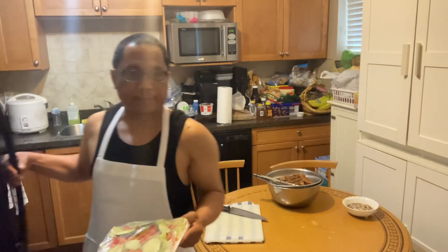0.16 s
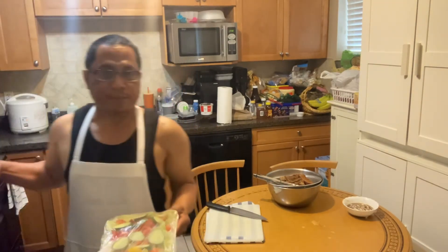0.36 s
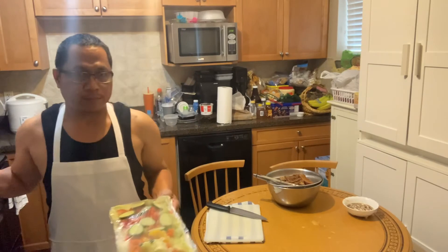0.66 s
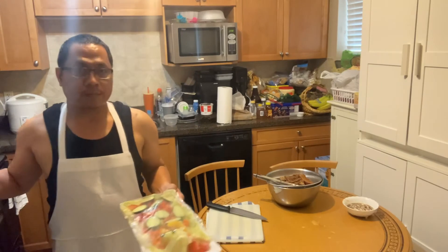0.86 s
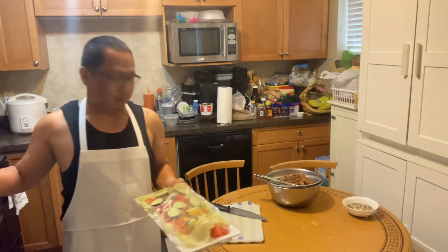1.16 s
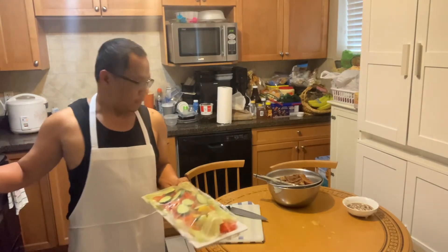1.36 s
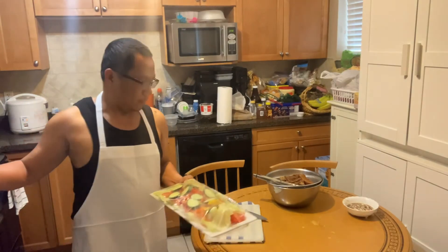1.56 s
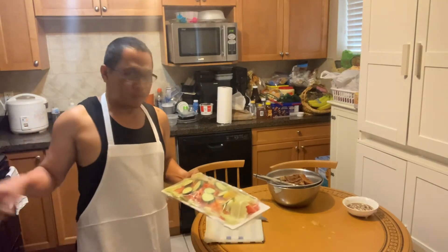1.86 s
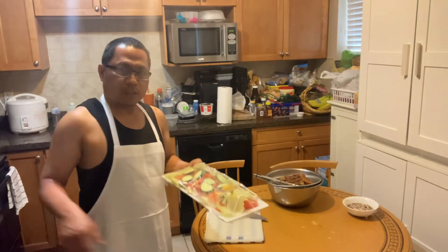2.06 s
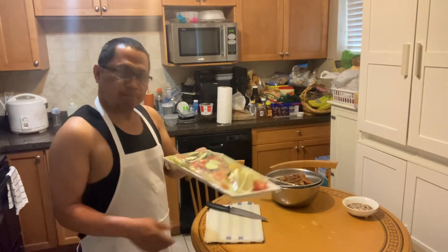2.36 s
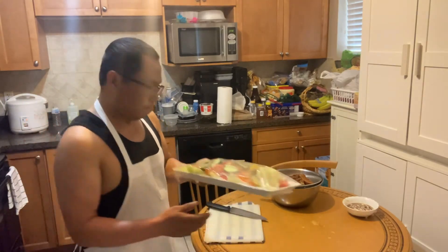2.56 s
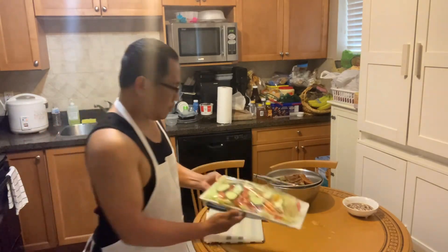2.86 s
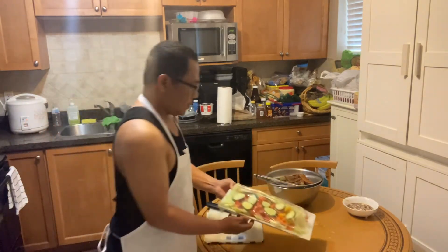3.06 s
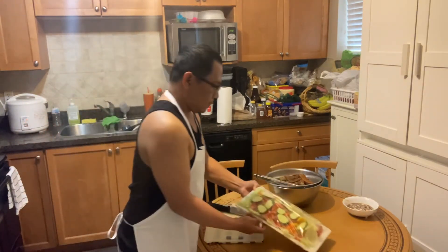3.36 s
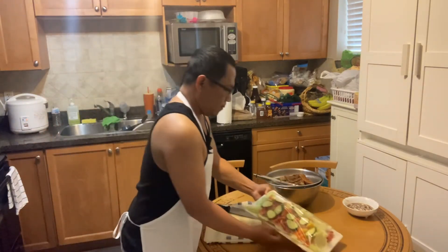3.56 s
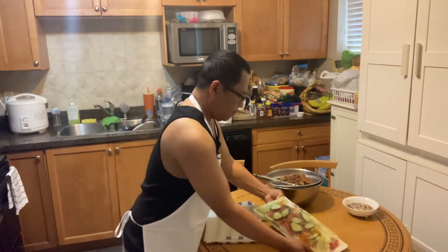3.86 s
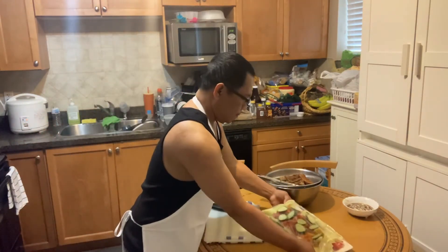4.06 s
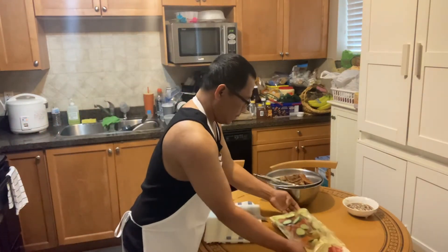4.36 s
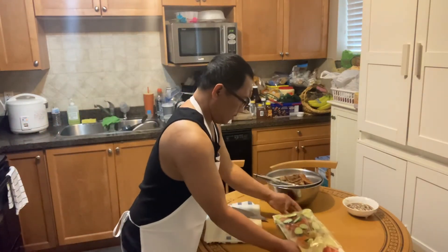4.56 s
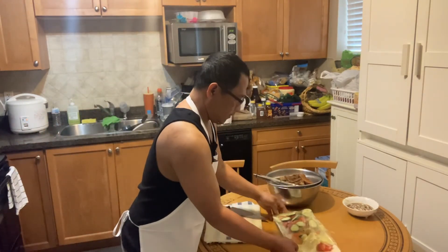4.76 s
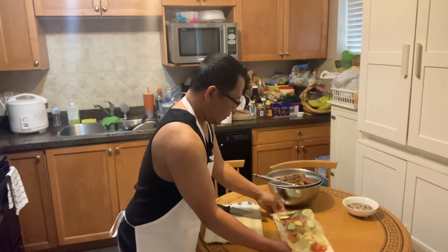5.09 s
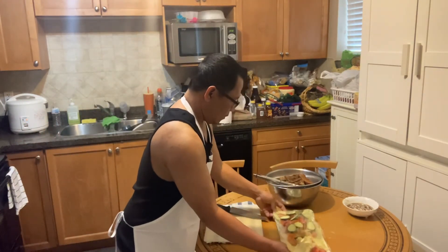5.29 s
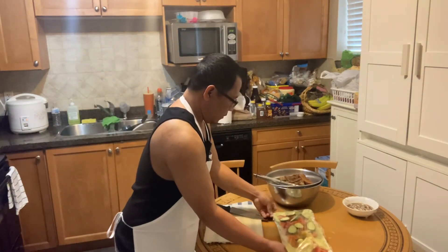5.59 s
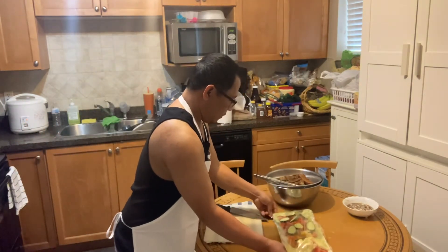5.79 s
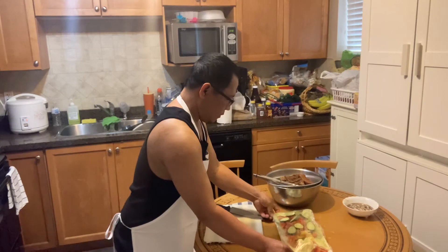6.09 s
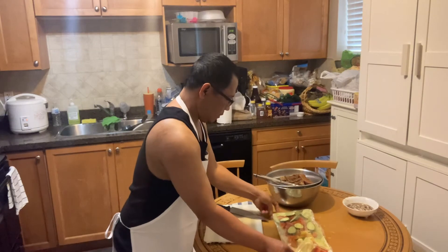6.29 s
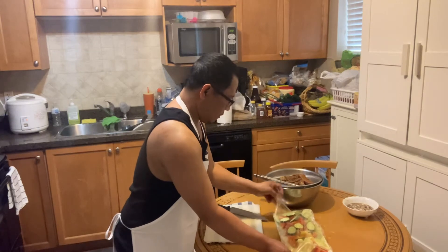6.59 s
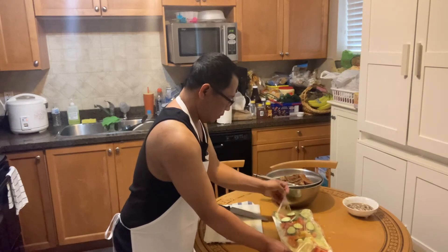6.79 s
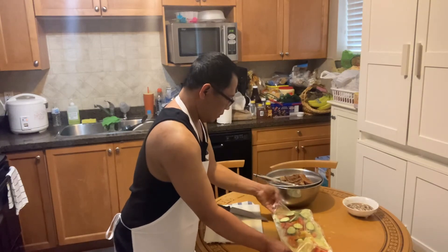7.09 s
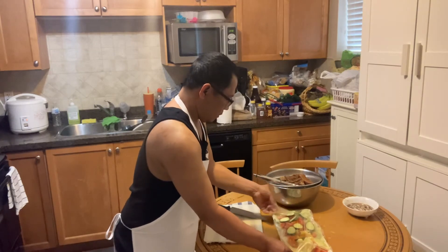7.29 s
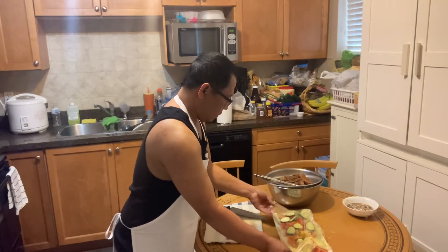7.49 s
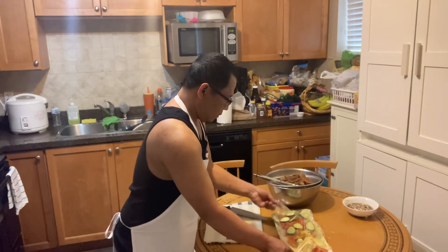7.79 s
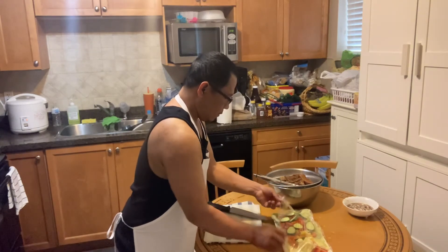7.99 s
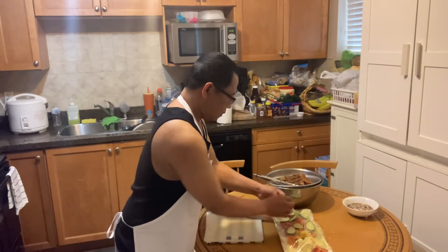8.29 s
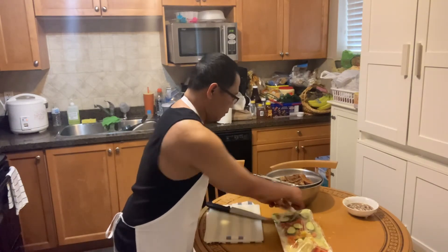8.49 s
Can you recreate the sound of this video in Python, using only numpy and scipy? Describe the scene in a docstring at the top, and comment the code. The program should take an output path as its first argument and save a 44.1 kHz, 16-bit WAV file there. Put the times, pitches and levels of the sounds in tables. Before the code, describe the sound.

A solid, boxy door thud on the left opens the scene, followed by a smaller knock and a soft deep bump. After a near-quiet gap with slight cloth and film rustle, a loaded platter clatters on a wooden tabletop in a quick cluster, then lands with a loud knock. Thin plastic wrap crinkles and snaps loose, busiest near the end. Short kitchen reverberation, low fridge drone, close stationary microphone.

```python
"""Refrigerator door, platter and cling film

A small home kitchen: a refrigerator door knocks and shuts, blows exciting its modes and a broad crack.
A platter is set down and dragged on a wooden table, whose top rings as damped modes under rim clatter.
Cling film is picked at and peeled: tiny random creases make its rustle, noise bursts its snaps; an apron
brushes too. Room air and a refrigerator drone, noise-driven resonances, lie below it all."""
import sys
import numpy as np
from scipy import signal
from scipy.fft import rfft, irfft, next_fast_len
from scipy.io import wavfile

SR = 44100
rng = np.random.default_rng(int(sys.argv[2]) if len(sys.argv) > 2 else 0)


def put_to_file(sound):
    """Save the sound as 16-bit audio at rate SR, in the file named by the first command-line argument."""
    columns = np.atleast_2d(sound).T  # one column per channel
    safe = np.clip(columns, -1, 1)
    whole_steps = np.round(safe * 32767)
    wavfile.write(sys.argv[1], SR, whole_steps.astype(np.int16))


N = 381024   # length in samples

# Edges of the half-octave noise bands. Each entry: frequency in Hz.
BAND_EDGES = 25 * 2 ** np.arange(0, 9.6, .5)
# Film snapping free. Each row: start in seconds, peak level of the tick in dB, body in dB relative to
# the tick, left-right balance in dB (positive is left), level of the crackle that follows in dB.
FILM_SNAPS = [(2.58, -55, 1, 0, -66), (3.15, -61, 7, 2, -65), (3.249, -43, -10.5, 2, -49),
              (3.323, -50, -5.5, 0, -51), (3.519, -58, -15, -4, -66), (3.71, -48, -5, 11, -51),
              (3.856, -52, -2, 0, -47.5), (4.027, -51, -23, -2, -48), (4.1785, -56, -16, -1, -55),
              (4.526, -56, -24, 10, -55), (4.699, -59, 14.5, 2, -88), (4.9155, -40, -13, 7, -43.5),
              (5.068, -47.5, -13, -11, -52), (5.212, -48, -11, 3.5, -53), (5.4862, -42, -12, 2, -56),
              (5.555, -61, -25, -20, -53), (6, -66.5, -12, -6.5, -57), (6.845, -43.5, -13, 10, -61),
              (7.1284, -46, -5, 2, -54), (7.245, -43, -24, -2, -55), (7.319, -41, -10, 4, -67),
              (7.38, -54, -16.5, 2, -64), (7.4, -44, -14, 0, -61), (7.4216, -42.5, -6, -11, -46),
              (7.451, -35, -20, 3, -62), (7.5466, -25, -6.5, 3.5, -37), (7.6069, -31.5, -3, 3, -49),
              (7.657, -33, -1.5, 5, -42), (7.708, -48, -12, 1, -60), (7.7194, -28.5, -4.5, 2, -38.5),
              (7.76, -33, -1.5, 2, -46.5), (7.989, -34.5, -7, 2, -49), (8.196, -50.5, -2, 4, -77),
              (8.269, -38.5, -16, 6, -49.5), (8.362, -52, -11, 3, -56.5)]
# Platter on the table. Each row: start in seconds, centre in Hz of the modes struck hardest, peak level
# of the ring in dB, peak level of the clatter in dB, hardness in dB per octave, seconds until the platter
# settles, slips in dB relative to unit contact force, left-right balance in dB (positive is left),
# boost of the top's main ring in dB, boost of the treble in dB.
PLATTER_KNOCKS = [(3.632, 2250, -19.5, -23, -6, 0.066, -12, -3, -5, 2.5),
                  (3.729, 700, -49, -44, -16, 0.02, -15, -5, 3, 3),
                  (3.874, 1900, -13, -16.5, -1, 0.12, -15, -2.5, -1, -5.5),
                  (3.914, 1250, -20, -24.5, -6.5, 0.09, -9, -4.5, 5, -10),
                  (3.961, 1400, -24.5, -35, -6.5, 0.062, -29, 3, 0, -10),
                  (3.998, 1250, -28, -28.5, -15, 0.042, -10, -5, 9, -2),
                  (4.188, 2700, -40.5, -50, -10, 0.28, 10, -3, 5, 11),
                  (4.226, 1900, -44.5, -54, -1, 0.053, -5, 3, -2, 1),
                  (4.287, 1400, -35, -35.5, -4.5, 0.039, -8, 2, -7, 6),
                  (4.302, 1900, -28, -35, -6, 0.054, 3, -5.5, -0.5, 4),
                  (4.375, 1300, -20, -19.5, -7.5, 0.064, -13, 1.5, -5.5, 7),
                  (5.286, 1000, -26, -33, 2, 0.028, -8, -2.5, -12, -5),
                  (5.297, 1200, -10, -8, 5, 0.09, -20, -1, 2, -2.5),
                  (5.301, 2420, -7.5, -12, 1.5, 0.071, -30, -3.5, -1.5, -10.5),
                  (5.667, 1400, -39, -52.5, 1.5, 0.042, -18.5, -2, 13, 9),
                  (6.61, 500, -57.5, -40, -18, 0.032, -6, -2, -5.5, -1.5)]


def amp(db):
    """Logarithmic level: decibels to amplitude gain."""
    return 10 ** (np.asarray(db) / 20)


def rms_one(x):
    """Power normalisation: scaled to rms 1."""
    return x / np.sqrt(np.mean(x ** 2) + 1e-20)


def at_hz(points, hz):
    """Interpolation of a spectrum table on a logarithmic frequency axis."""
    table_hz, values = np.array(points).T
    return np.interp(np.log(hz), np.log(table_hz), values)


def band(x, low_hz, high_hz):
    """Band-pass filtering: second-order Butterworth slopes."""
    return signal.sosfilt(signal.butter(2, [low_hz, high_hz], "band", fs=SR, output="sos"), x + 1e-18)


def colour(x, spectrum):
    """Spectral shaping: a white input is weighted bin by bin in the frequency domain."""
    size = next_fast_len(len(x))
    hz = np.maximum(np.arange(size // 2 + 1) * SR / size, 1)
    return irfft(rfft(x, size) * amp(at_hz(spectrum, hz)), size)[:len(x)]


def sides(pan_db):
    """Intensity stereo: left and right gains that differ by pan_db."""
    return amp(np.array([[.5], [-.5]]) * pan_db)


def drift(rate):
    """Random modulation: straight lines between normal draws, rate of them a second (at most 40)."""
    knots = rng.standard_normal(int(N / SR * 40) + 2)
    return np.interp(np.arange(N) / SR * min(rate, 40), np.arange(len(knots)), knots)


def ring(force, hz, t60):
    """Damped resonator: a unit click rings as a cosine of height 1; little passes far below its pitch."""
    radius = amp(-60 / (max(t60, .005) * SR))
    w = 2 * np.pi * hz / SR
    return signal.lfilter([.5, 0, -.5], [1, -2 * radius * np.cos(w), radius * radius], force)


def add(out, sound, s, peak_db, pan_db):
    """Superposition: lays a sound in at its time, peak level and place."""
    i = round(s * SR)
    piece = sides(pan_db) * amp(peak_db) * sound / np.abs(sound).max()
    out[:, i:i + len(sound)] += piece[:, :N - i]


def stereo_bands(size, gain, likeness):
    """Interchannel correlation: half-octave noise bands, each mixing a common and an opposed signal."""
    out = 0
    white = rng.standard_normal((2, 2, size))   # neighbouring bands use different noise
    for k, (low, high) in enumerate(zip(BAND_EDGES, BAND_EDGES[1:])):
        mid, side = band(white[k % 2], low, high)
        hz = np.sqrt(low * high)
        alike = np.clip(at_hz(likeness, hz), -1, 1)
        stereo = np.sqrt(1 + alike) * mid + np.sqrt(1 - alike) * side * [[1], [-1]]
        out = out + gain(hz) * stereo
    return out


def floor():
    """Broadband noise and noise-driven resonance: uneven room air and the refrigerator's wavering drone."""
    # Spectrum of the room air. Each row: frequency in Hz, relative density in dB per Hz.
    air_spectrum = [(15, -55), (25, -32), (48, -20), (70, 1.5), (101, -39.5), (211, -8), (242, -8),
                    (366, -28), (471, -15), (779, -19.5), (835, -24.5), (1070, -23), (6000, -48),
                    (7800, -71.5), (13200, -120)]
    # Likeness of the two sides of the air. Each row: frequency in Hz, correlation.
    air_likeness = [(60, 1), (180, 0.88), (550, 0.45), (1650, -0.85), (4970, -1.7), (15000, -0.3)]
    # Lean of the air. Each row: frequency in Hz, left-right balance in dB (positive is left).
    air_lean = [(60, 3), (180, 1), (550, 2), (1650, 3.5), (4970, 5), (15000, -12)]
    # Resonances stirred by the drone. Each row: frequency in Hz, width in Hz, rms level in dB,
    # left-right balance in dB (positive is left).
    drone_resonances = [(56.84, 1.7, -65.5, -7), (132.1, 22, -66.5, -4), (170, 4.6, -69, 3.5),
                        (215.25, 4.6, -59, -5), (364, 22, -65.5, -3.5)]
    air_rms_db = -59

    def air_gain(hz):
        """Amplitude modulation: one band's level wanders slightly."""
        return amp(at_hz(air_spectrum, hz) + 0.47 * drift(8.1)) * sides(at_hz(air_lean, hz))

    out = amp(air_rms_db) * rms_one(stereo_bands(N, air_gain, air_likeness))
    for hz, width, db, pan_db in drone_resonances:
        t60 = np.log(1000) / (np.pi * width)
        hum = ring(rng.standard_normal(N), hz, t60)
        out = out + sides(pan_db) * amp(db) * rms_one(hum)
    return out


def door():
    """Modal excitation: a smooth push drives the low modes, ragged contact the middle ones and a crack."""
    # Door blows. Each row: start in seconds, peak of the middle modes in dB, peak of the low modes in dB,
    # peak of the crack in dB, crack tilt in dB per octave, crack bottom in Hz, crack top in Hz, contact
    # time scale in seconds, push time scale in seconds, shaking as a share of contact noise,
    # left-right balance in dB (positive is left), boost of the deepest mode in dB.
    blows = [(0.062, -56, -60, -35.5, -2.5, 400, 6030, 0.036, 0.002, 0.0092, 12, -1),
             (0.079, -5.5, -10, -21.5, -11, 384, 5050, 0.022, 0.00064, 0.02, 7.5, 15),
             (0.093, -19, -21, -14, -1.5, 414, 5200, 0.016, 0.0023, 0.012, 9.5, 12),
             (0.114, -37, -23.5, -28, 1, 297, 4000, 0.012, 0.0022, 0.022, 6, 1),
             (0.444, -27, -38.5, -27.5, -3.5, 292.4, 4500, 0.019, 0.00085, 0.037, 5, 4),
             (0.656, -62, -63, -50, 0, 880, 5160, 0.062, 0.0039, 0.052, 6, -5),
             (0.717, -74, -50, -39.5, 1, 870, 4340, 0.017, 0.002, 0.08, 8.5, -7),
             (0.839, -73, -69, -52.5, 3, 1490, 12800, 0.049, 0.0022, 0.088, 9.5, 24),
             (1.37, -70, -22.5, -20, 2.5, 150, 14200, 0.026, 0.0018, 0.0092, 9, 25.5)]
    # Modes of door and cabinet. Each row: frequency in Hz, relative level in dB, decay t60 in seconds.
    modes = [(50.4, 2, 0.058), (73.65, -4.5, 0.9), (124, 12.5, 0.14), (154, 15, 0.06), (196, 10.5, 0.07),
             (248, 11, 0.076), (427, -3.5, 0.11), (527, -2.5, 0.067), (670, 6, 0.099), (806, 9.5, 0.04),
             (964, 15, 0.033), (1077, 12.5, 0.024), (1299, 1.5, 0.067), (1452, -1.5, 0.03),
             (1800, -4, 0.045), (1940, -31, 0.061), (2770, -24, 0.047), (4830, -24, 0.031)]
    # Crack of latch, seal and shelves. Each row: frequency in Hz, relative density in dB per Hz.
    crack_spectrum = [(120, 21.5), (330, 21), (700, 11), (1500, 5), (3000, -0.5), (4600, -2), (6300, -3),
                      (9000, -5.5), (13000, -16), (15800, -29.5)]
    latch_strength = 8.5   # sharp blow of the latch against the ragged contact

    out, panel = np.zeros((2, N)), np.zeros((2, N))
    t = np.arange(SR // 2) / SR
    latch = latch_strength * (np.arange(len(t)) == 80)   # a single click, in samples after the start
    for (s, knock_db, push_db, crack_db, tilt_db, low_hz, top_hz,
         contact, push, shake, pan_db, deep_db) in blows:
        force = rng.standard_normal(len(t)) * t / contact * np.exp(-3 * t / contact)
        # jars on the shelves
        shaking = rng.standard_normal(len(t)) * np.clip(t / contact, 0, 1) * np.exp(-t / 0.036)
        ragged = force + shake * shaking
        shove = np.exp(-((t - .007) / push) ** 2)   # a longer push leaves out the higher of the low modes
        lows, mids = 0, 0
        for k, (hz, db, t60) in enumerate(modes):
            if hz < 300:
                lows = lows + amp(db + deep_db * (hz < 60)) * ring(shove, hz, t60)
            else:   # the latch drives neighbouring modes with opposite sign
                mids = mids + amp(db) * ring(ragged + (-1) ** k * latch, hz, t60)
        crack = colour(ragged, [(hz, db + tilt_db * np.log2(hz)) for hz, db in crack_spectrum])
        crack = band(band(crack, low_hz, top_hz), low_hz, top_hz)
        add(out, lows, s, push_db, pan_db - 14.5)   # the low modes lie further right
        add(panel, mids, s, knock_db, pan_db)
        add(out, crack, s, crack_db, pan_db)
    return out, panel


def brush(t, s, swell, hold, db):
    """Power envelope: a brush swells, holds and fades exponentially."""
    swell_db, fade_db_per_s = 18, 178
    early = np.maximum(s + swell - t, 0)
    late = np.maximum(t - s - swell - hold, 0)
    return amp(db - swell_db * early / swell - fade_db_per_s * late) ** 2


def crackle(t, s, db):
    """Power envelope: a crackle starts quickly, holds and fades exponentially."""
    rise_s, hold_s, fade_db_per_s = 0.0097, 0.0028, 205.5
    late = np.maximum(t - s - hold_s, 0)
    return np.clip((t - s) / rise_s, 0, 1) * amp(db - fade_db_per_s * late) ** 2


def rustle():
    """Shot noise: thousands of tiny creases a second, clumped and uneven in size, form film and cloth."""
    # Hands working at the film. Each row: time in seconds, treble level in dB, middle relative to it in dB.
    handling = [(2.9, -78, -3), (3.05, -69.5, -1), (3.331, -69.5, 0), (3.48, -67.5, -6), (4.30, -59, -0.5),
                (4.66, -67, 0.5), (4.731, -72, 5), (4.80, -58, -12), (4.88, -62, -10), (5.45, -56, -5),
                (5.869, -64, -12.5), (5.95, -77.5, -0.5), (6.159, -55, -11.5), (6.29, -50, -14.5),
                (6.394, -42.5, -5.5), (6.47, -57, -11), (6.821, -56.5, -11), (7.11, -65.5, -10),
                (7.299, -52, -10.5), (7.46, -48, -8.5), (7.52, -57, -4.5), (7.7, -61, -15),
                (7.80, -72, -17), (7.92, -61.5, -6), (8.1, -56.5, -7.5), (8.401, -65, -15.5),
                (8.569, -80.5, -22.5), (8.64, -53, -9)]
    # The apron brushing as the cook turns. Each row: start in seconds, swell in seconds, hold in seconds,
    # cloth level in dB, middle relative to it in dB.
    apron_brushes = [(0.328, 0.046, 0.11, -73.5, 3.5), (0.45, 0.022, 0.022, -64.5, -23),
                     (0.978, 0.029, 0.61, -72, -9), (1.104, 0.031, 0.022, -83, 15),
                     (1.86, 0.02, 0.0089, -95.5, 22.5), (2.142, 0.025, .01, -95.5, 23),
                     (2.432, 0.072, 0.14, -66.5, -7), (2.858, 0.026, 0.018, -82.5, 9.5)]
    # Spectrum of the film. Each row: frequency in Hz, relative density in dB per Hz.
    film_spectrum = [(1200, -27.5), (2000, -19.5), (4000, -1), (6000, -8.5), (8500, 0), (12000, -4),
                     (15800, 3.5)]
    # Spectrum of the apron. Each row: frequency in Hz, relative density in dB per Hz.
    apron_spectrum = [(1200, -35), (4000, -4.5), (6000, -19), (8500, -7.5), (12000, -2.5), (15800, 0.5)]
    crackle_middle_db = -4.5   # added to the crackle's level and to any negative body level of the snap
    # level after a full-scale knock; share of the knock's dB added to it; delay after the knock
    knock_crackle_db, knock_share, knock_delay_s = -54.5, 0.21, 0.01
    crease_spread_db, flicker_db = 4.1, 1.8   # unevenness of single creases; from moment to moment

    s, treble_db, middle_db = np.transpose(handling)
    t = np.arange(N // 32 + 2) * 32 / SR   # envelopes are computed every 32 samples
    treble = amp(np.interp(t, s, treble_db)) ** 2
    middle = treble * amp(np.interp(t, s, middle_db)) ** 2
    cloth = 0
    for s, swell, hold, db, middle_db in apron_brushes:
        cloth = cloth + brush(t, s, swell, hold, db)
        middle = middle + brush(t, s, swell, hold, db + middle_db)
    for s, _, body_db, _, db in FILM_SNAPS:
        treble = treble + crackle(t, s, db)
        middle = middle + crackle(t, s, db + min(body_db, 0) + crackle_middle_db)
    for s, _, ring_db, *_ in PLATTER_KNOCKS:
        treble = treble + crackle(t, s + knock_delay_s, knock_crackle_db + knock_share * ring_db)
    # from powers to gains, sample by sample
    treble, middle, cloth = (np.interp(np.arange(N) / SR, t, np.sqrt(p)) for p in (treble, middle, cloth))

    sizes = amp(crease_spread_db * np.minimum(rng.exponential(1, N), 5.5)) * rng.choice([-1, 1], N)
    creases_per_s = 6500 * amp(4.0 * drift(38))
    creases = sizes * (rng.random(N) < creases_per_s / SR)
    creases = creases * amp(flicker_db * drift(25))
    film = treble * rms_one(colour(creases, film_spectrum))
    apron = cloth * rms_one(colour(creases, apron_spectrum))
    # reversed creases keep the middle independent of the treble
    middles = middle * rms_one(band(creases[::-1], 480, 2300))
    return sides(.5) * (film + apron + middles)


def snaps():
    """Impulsive release: a broad noise tick with a short fizz behind it, and a duller body."""
    out = np.zeros((2, N))
    t = np.arange(SR // 10) / SR
    tick = t / 0.0005 * np.exp(1 - t / 0.001)
    fizz = 0.4 * np.clip(t / 0.0012, 0, 1) * np.exp(-t / 0.006)
    body_tail = 0.72 * np.clip(t / 0.0031, 0, 1) * np.exp(-t / 0.012)
    for s, peak_db, body_db, pan_db, _ in FILM_SNAPS:
        burst = rng.standard_normal(len(t)) * (tick + fizz)
        add(out, band(burst, 2500, 17000), s, peak_db, pan_db)
        body = rng.standard_normal(len(t)) * (tick + body_tail)
        add(out, band(body, 420, 1600), s, peak_db + body_db, pan_db)
    return out


def table():
    """Modal synthesis: blow, rattle and slips drive the top, damped by the platter's weight as it settles."""
    # Modes of the table top. Each row: frequency in Hz, relative level in dB, decay t60 in seconds.
    modes = [(73.3, -21.5, 0.087), (157.8, -9, 0.097), (232, -15, 0.032), (324.8, -2.5, 0.25),
             (362.6, 4.5, 0.61), (401, -4.5, 0.17), (522, -11, 0.16), (596, -0.5, 0.098), (642, -3.5, 0.29),
             (727, -7.5, 0.3), (833.4, -3, 0.14), (909, -11.5, 0.06), (1067, -9, .1), (1110, -7, 0.077),
             (1219, 0, 0.085), (1388, -2, 0.1002), (1800, -15, 0.097), (1900, -13, 0.12), (2020, -17, 0.2),
             (2188, -15.5, 0.14), (2250, -19, 0.12), (2387, -22, 0.25), (2650, -26, .1),
             (2700, -32.5, 0.16), (3200, -34, .12), (3750, -30, .2), (4243, -45.5, .08),
             (4910, -38.5, 0.085)]
    # Clatter of the platter rim on wood. Each row: frequency in Hz, relative density in dB per Hz.
    clatter_spectrum = [(60, -8.5), (200, -11), (400, 12.5), (900, 7.5), (1450, 0), (1750, -5),
                        (2500, -22.5), (4000, -36), (5500, -70), (15800, -57.5)]
    # strength of the blow, spread of its arrival, its length in cycles of a mode
    blow_strength, blow_spread_s, blow_cycles = 13.6, 0.0055, 0.41
    deep_settle_db_per_s, high_settle_db_per_s = 900, 253   # extra damping once settled
    near_lift_db, near_octaves = 9, .13   # lift of the modes struck hardest, and its width
    mode_spread_db = 1.5   # each blow strikes the modes a little differently
    # the rocking platter makes the deep ring and clatter flutter: depth, time between changes
    rocking_db, rocking_s = 2.5, .012

    rings, clatters = np.zeros((2, N)), np.zeros((2, N))
    t = np.arange(SR // 4) / SR
    for (s, near_hz, ring_db, clatter_db, hard_db, settle,
         slips_db, pan_db, main_db, treble_db) in PLATTER_KNOCKS:
        grit = rng.standard_normal((len(modes) + 1, len(t)))   # each mode feels its own patch of contact
        force = t / 0.0016 * np.exp(-t / 0.006) + amp(slips_db) * (t < settle)
        settled = np.maximum(t - settle, 0)
        rocking = rocking_db * np.interp(t / rocking_s, np.arange(30), grit[-1, -30:])
        deep = amp(rocking - deep_settle_db_per_s * settled)
        high = amp(-high_settle_db_per_s * settled)

        def struck(hz, db):
            """Spectral weighting: relative level of a partial under this blow."""
            near_db = near_lift_db * np.exp(-(np.log2(hz / near_hz) / near_octaves) ** 2)
            boost_db = main_db * (300 < hz < 450) + treble_db * (hz > 1600)
            return db + near_db + boost_db + hard_db * np.log2(max(hz, 300))

        body = 0
        for g, (hz, db, t60) in zip(grit, modes):
            arrival = .001 + abs(g[0]) * blow_spread_s   # reaches each mode at its own moment
            blow = np.exp(-((t - arrival) * hz / blow_cycles) ** 2)
            drive = force * g + blow_strength * np.sign(g[1]) * blow / blow.sum()
            mode = ring(drive, hz, t60)
            level = amp(struck(hz, db) + mode_spread_db * g[2])
            body = body + level * mode / np.abs(mode).max() * (deep if hz < 450 else high)
        load = 0.28 * np.clip(t / 0.0025, 0, 1) * np.exp(-t / 0.01)   # the load shakes a little longer
        rattle = (force + load) * grit[-1]
        clatter = colour(rattle, [(hz, struck(hz, db)) for hz, db in clatter_spectrum])
        add(rings, band(body, 34, 3300), s, ring_db, pan_db)   # wood passes little treble
        add(clatters, clatter * deep, s, clatter_db, pan_db - 4.0)
    return rings, clatters


def reflections():
    """Diffuse reverberation: dense echoes build up within milliseconds and decay band by band."""
    # Decay of the room. Each row: frequency in Hz, t60 in seconds.
    room_t60 = [(60, 0.38), (250, 0.3), (1000, 0.28), (4000, 0.31), (12000, 0.32)]
    # Likeness of the two sides of the tail. Each row: frequency in Hz, correlation.
    room_likeness = [(60, 0.97), (140, 0.66), (300, 0.594), (1000, 0.053), (4000, 0.02), (12000, 0.048)]
    t = np.arange(SR // 2) / SR

    def decay(hz):
        """Exponential decay, weighted so that long bands hold no more energy than short ones."""
        t60 = at_hz(room_t60, hz)
        return amp(-60 * t / t60) / np.sqrt(t60)

    tail = stereo_bands(len(t), decay, room_likeness)
    tail = tail * np.clip(t / 0.025, 0, 1)
    return tail / np.sqrt(np.sum(tail ** 2) / 2)


def heard(dry, lag, wet_db):
    """Interchannel delay: direct left (lag samples late) and right, and the mono share sent to the room."""
    return np.array([np.roll(dry[0], lag), dry[1], amp(wet_db) * dry.mean(axis=0)])


def scene():
    """Direct and reverberant fields: each source sends its share into the room, over the floor."""
    # Samples by which left trails right, in the order door, table, film.
    door_lag, table_lag, film_lag = [-9, 2, 1]
    slab, panel = door()
    rings, clatters = table()
    top = heard(rings, table_lag, wet_db=-7.0)
    top[2] = band(top[2], 420, 9000)   # the top's deep modes reach the room weakly
    near = heard(slab, door_lag, wet_db=-2.5) + heard(panel, door_lag, wet_db=-4.0)
    near = near + top + heard(clatters, table_lag, wet_db=-0.5)
    near = near + heard(rustle() + snaps(), film_lag, wet_db=-5)
    reverberation = signal.fftconvolve(near[2:], reflections(), axes=1)[:, :N]
    return near[:2] + reverberation + floor()


def record(dry):
    """Band limiting: the deepest bass and the extreme treble are filtered out."""
    thin = signal.sosfilt(signal.butter(6, 41, "high", fs=SR, output="sos"), dry)
    return signal.sosfilt(signal.cheby2(12, 70, 16300, fs=SR, output="sos"), thin)


dry = scene()
out = record(dry)
put_to_file(out)
```